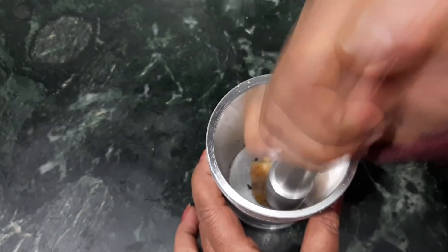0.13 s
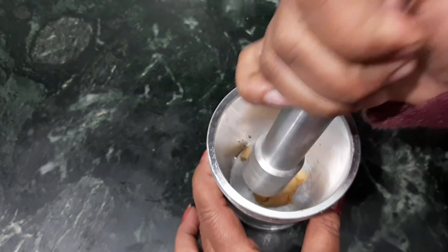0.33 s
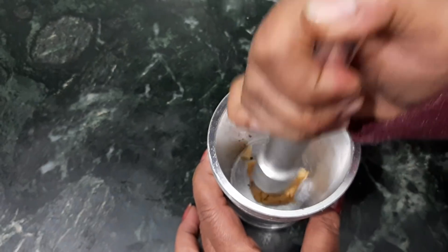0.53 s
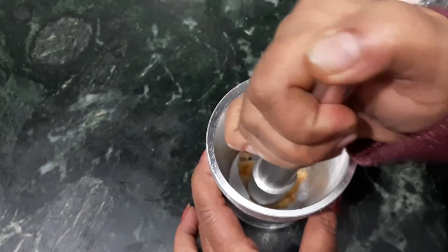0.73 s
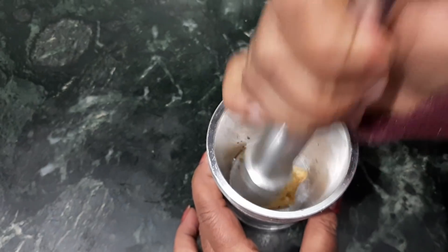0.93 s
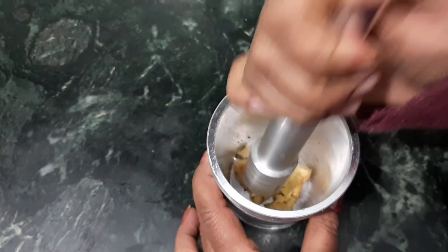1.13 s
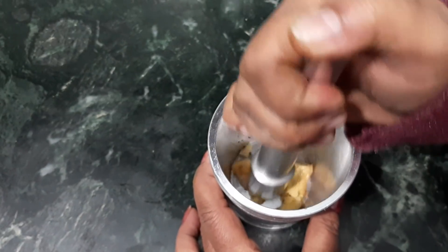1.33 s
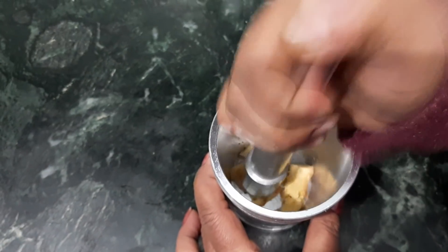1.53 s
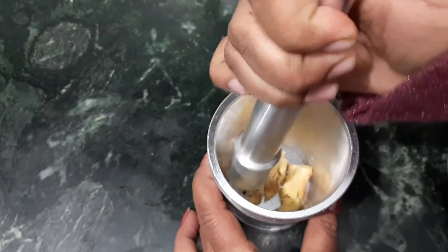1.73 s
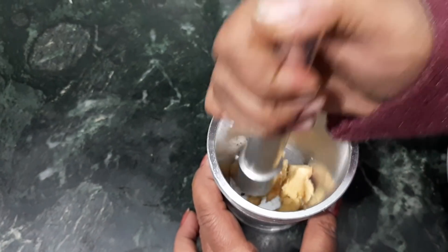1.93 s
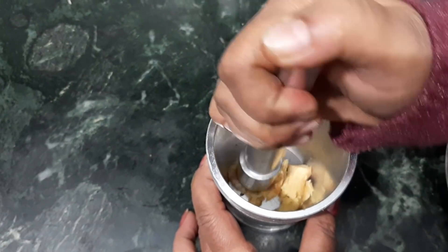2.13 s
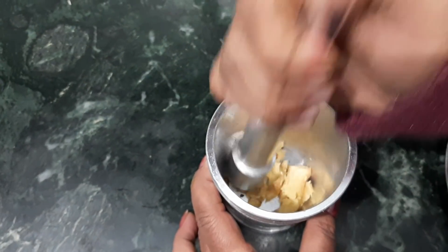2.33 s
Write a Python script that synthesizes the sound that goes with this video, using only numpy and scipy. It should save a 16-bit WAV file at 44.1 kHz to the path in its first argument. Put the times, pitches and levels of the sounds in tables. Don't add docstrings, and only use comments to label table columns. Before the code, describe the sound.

A metal pestle pounds ginger in a gripped metal mortar, heard close in a small kitchen over faint room hush and a low motor drone. Eight blows fall evenly, from 0.2 to 2.1 seconds, about 0.28 apart: crisp wet crunch, brief metallic ring, low boom through the stone counter. The later blows leave more worktop hum. At 2.3 seconds the pestle clinks and chatters on the bare rim, ringing briefly.

```python
import sys
import numpy as np
from scipy import signal
from scipy.fft import rfft, irfft, next_fast_len
from scipy.io import wavfile
from scipy.ndimage import uniform_filter1d, map_coordinates

SR = 44100
rng = np.random.default_rng(int(sys.argv[2]) if len(sys.argv) > 2 else 0)


def wav_out(sig):
    wavfile.write(sys.argv[1], SR, np.round(np.clip(np.atleast_2d(sig).T, -1, 1) * 32767).astype(np.int16))


def natural_amplitude(level_db):
    exponent = np.asarray(level_db, float) / 20
    return 10 ** exponent


N = 104958


def unit(x):
    return x / np.sqrt(np.mean(x ** 2) + 1e-20)


def along(points, hz):
    f, v = np.transpose(points)
    return np.interp(np.log(hz + 1), np.log(f + 1), v)


# frequency in Hz, left-right correlation (0 to 1).
PORT_LIKENESS = [(60, 1), (450, 0.81), (700, 0.031), (1400, 0.012), (2500, 0.21), (4500, 0.018),
                 (15000, 0.019)]


def port_angle(hz):
    return np.arccos(np.clip(along(PORT_LIKENESS, hz), -1, 1)) / 2


def hiss(count, response):
    hz = np.fft.rfftfreq(count, 1 / SR)
    turn = port_angle(hz)
    spectra = rfft(rng.standard_normal((2, count))) * response(hz)
    mid, side = irfft(spectra * [np.cos(turn), np.sin(turn)], count)
    return unit(np.array([mid + side, mid - side]))


def dying(x, t60s):
    hz, t, z = signal.stft(x, SR, nperseg=256)
    fade = natural_amplitude(-60 * t / along(t60s, hz)[:, None])
    return signal.istft(z * fade, SR, nperseg=256)[1][:, :x.shape[1]]


RATTLE_RATE_HZ = 130


def ring(modes, t, scatter_db, detune, rattle_db=0):
    hz, db, t60, rise = np.transpose(modes)[:, :, None]
    level_luck, pitch_luck, phase_luck = rng.standard_normal((3, len(modes), 1))
    knots = rng.standard_normal((len(modes), 200))
    rattle = np.array([np.interp(t * RATTLE_RATE_HZ, np.arange(200), row) for row in knots])
    turn = port_angle(hz) * np.sign(phase_luck + 0.8)
    size = natural_amplitude(db + scatter_db * level_luck + rattle_db * rattle - 60 * t / t60)
    size = size * (1 - np.exp(-t / rise)) ** 3
    phase = 2 * np.pi * hz * (1 + detune * pitch_luck) * t + rattle_db / 6 * rattle[:, ::-1]
    return np.array([(size * np.sin(phase + side * turn)).sum(0) for side in (1, -1)])


def add(out, x, s):
    part = out[:, round((s + 1) * SR):][:, :x.shape[1]]
    part += x[:, :part.shape[1]]


# frequency in Hz, level in dB.
HUSH = [(40, -44), (70, -17), (140, 4), (300, -12), (900, -21), (1250, -37), (2500, -29), (7560, -26),
        (15600, -31.5), (16500, -21)]
HUSH_DB, HUM_DB, HUM_HZ = -50.5, -47, 128


def kitchen():
    drone = hiss(N, lambda f: 1 / (1 + ((f - HUM_HZ) / 6) ** 2))
    hush = hiss(N, lambda f: natural_amplitude(along([(15, -70), *HUSH, (17000, -120)], f)))
    return natural_amplitude(HUSH_DB) * hush + natural_amplitude(HUM_DB) * drone


# frequency in Hz, level in dB.
CRUNCH = [(1200, -23), (1800, -28), (2500, -10.5), (7500, 1.5), (9000, -1.5), (13000, 0.5), (15800, -5),
          (16500, -42)]
# centre in Hz, width in Hz, level in dB.
CAVITY = [(2440, 210, 9), (3520, 980, 5.5), (5030, 440, 2), (5550, 1800, -12), (7360, 470, 1.5),
          (10100, 300, -4), (10800, 1300, -2), (14700, 600, 1)]
# frequency in Hz, t60 in s.
TAIL_T60 = [(1500, 0.98), (3000, 0.56), (7000, 0.34), (10000, 0.28), (15000, 0.31)]
LEAD_S, LEAD_DB, RISE_S, CRUNCH_T60_S = 0.0023, -29, 0.00081, 0.024
SQUELCH_DB, SQUELCH_T60_S, TAIL_DB, GRIT_DB = -2.5, 0.027, -17, 2.5
STREAK_DB, STREAK_HZ = 3.5, 170


def crunch(bands_db):
    t = np.arange(SR // 2) / SR
    luck = rng.standard_normal((len(CAVITY), 2))
    lean = list(zip((3200, 6500, 12500), np.subtract(bands_db, np.mean(bands_db))))
    knots = rng.standard_normal(200)

    def hollow(f):
        total = 0
        for (centre, width, db), (louder, sharper) in zip(CAVITY, luck):
            offset = (f - centre * (1 + 0.038 * sharper)) / width
            total = total + natural_amplitude(db + 2.8 * louder) / (1 + 2j * offset)
        return 0.97 + np.abs(total)

    def colour(f):
        return natural_amplitude(along([(600, -120), *CRUNCH], f) + along(lean, f)) * hollow(f)

    def streaky(f):
        return colour(f) * natural_amplitude(STREAK_DB * np.interp(f / STREAK_HZ, np.arange(200), knots))

    after = np.maximum(t - LEAD_S, 0)
    give = natural_amplitude(LEAD_DB) * np.minimum(t / LEAD_S, 1) * natural_amplitude(-60 * t / CRUNCH_T60_S)
    snap = (1 - np.exp(-after / RISE_S)) * natural_amplitude(-60 * after / CRUNCH_T60_S)
    squelch = natural_amplitude(SQUELCH_DB - 60 * after / SQUELCH_T60_S) * (after > 0)
    grit = natural_amplitude(GRIT_DB * unit(uniform_filter1d(rng.standard_normal(len(t)), size=30)))
    wet = (give + snap + squelch) * grit * hiss(len(t), colour)
    return wet + natural_amplitude(TAIL_DB) * (after > 0) * dying(hiss(len(t), streaky), TAIL_T60)


NOTE_T60_S, MASH_DAMPS_PER_S, PAIR_HZ = 0.28, 1.1, 22


def bowl_note(s, hz):
    t = np.arange(SR // 2) / SR
    t60 = NOTE_T60_S * np.exp(-MASH_DAMPS_PER_S * max(s - 0.5, 0))
    pair = [(hz, -3, t60, 0.001), (hz + PAIR_HZ, -7, t60, 0.001)]
    return ring(pair, t, scatter_db=1.5, detune=0.00038, rattle_db=9.5)


# frequency in Hz, level in dB, t60 in s, build-up in s.
COUNTER = [(78.1, -8, 0.71, 0.0064), (97.97, -2.5, 0.52, 0.0019), (128.84, -11, 0.97, 0.013),
           (299.1, 1.5, 0.12, 0.0084), (315.3, -15, 0.3, 0.0046), (407.5, -10, 0.31, 0.02),
           (445.2, 1, 0.084, 0.014), (866, -22, 0.25, 0.005), (941, -16.5, 0.21, 0.013),
           (1031, -24.5, 0.31, 0.015)]
# frequency in Hz, level in dB, t60 in s, build-up in s.
WORKTOP = [(195, 60, .1, .15), (198, -8, .45, .03), (178, -4, .3, .02), (245, 8, .08, .005),
           (222, -3, .3, .01)]
# frequency in Hz, level in dB, t60 in s, build-up in s.
KNOCK = [(490.5, -27.5, 0.053, 0.00059), (486, -40.5, 0.3, 0.035), (543.6, -46, 0.2, 0.00071),
         (629.5, -43, 0.27, 0.0014), (442, -36.5, 0.16, 0.0041)]
# frequency in Hz, level in dB.
THUD = [(60, 2), (250, 0), (520, -2.5), (900, -8), (1500, -19), (2200, -24)]
# frequency in Hz, t60 in s.
RUMBLE_T60 = [(60, 0.35), (200, 0.97), (500, 0.55), (1200, 0.45), (2000, 0.85)]
BOOM_DB, THUD_DB, RUMBLE_DB = 6.5, -28, -13


def counter(knock_db, boom_db, note_db, landing_db):
    t = np.arange(SR // 2) / SR
    hum, chest, box, cup = landing_db
    place = [(105, 0), (129, hum), (180, 0), (300, chest), (400, 0), (520, 0), (633, box), (930, cup), (1300, 0)]

    def favoured(modes):
        return [(hz, db + along(place, hz), *times) for hz, db, *times in modes]

    low = hiss(len(t), lambda f: natural_amplitude(along([(40, -60), *THUD, (3000, -120)], f) + along(place, f)))
    thud = natural_amplitude(THUD_DB - 60 * t / 0.036) * low * (1 - np.exp(-t / 0.0037))
    knock = thud + ring(favoured(KNOCK), t, scatter_db=0.7, detune=0.011, rattle_db=2.0)
    rumble = natural_amplitude(RUMBLE_DB) * dying(low, RUMBLE_T60) * (1 - np.exp(-t / 0.00055))
    boom = rumble + ring(favoured(COUNTER), t, scatter_db=0.73, detune=0.0048, rattle_db=1.72)
    note = ring(WORKTOP, t, scatter_db=1.4, detune=0.0022, rattle_db=4.5)
    return natural_amplitude(knock_db) * knock + natural_amplitude(boom_db + BOOM_DB) * boom + natural_amplitude(note_db) * note


# start in seconds, crunch peak in dB, boom in dB, worktop note in dB, bowl ring in dB.
BLOWS = [
    (0.1928, -12.5, -31.5, -43.5, -34),
    (0.4735, -10, -31, -40, -31),
    (0.754, -11.5, -32.5, -42.5, -55),
    (1.0315, -11.5, -33, -48, -28),
    (1.3097, -10, -32, -36, -28),
    (1.5889, -12.5, -32, -27.5, -24),
    (1.8593, -14, -33, -28.5, -25.5),
    (2.138, -9, -31, -26.5, -24),
]
# bowl note in Hz, crunch low, middle and top in dB, knock in dB.
COLOURS = [(2690, -22, -24, -27.5, 1), (2490, -18, -20.5, -23, -1), (2440, -8.5, -9, -12.5, 0),
           (2540, -34.5, -31, -33.5, 1), (2500, -30.5, -33, -29, 1), (2565, -29, -31.5, -29.5, 2),
           (2775, -29, -27.5, -33, -0.5), (2620, -17, -16, -21.5, 7)]
EARLIER = (-9, -31, -57, -39, 2501, 1.5, -2, 0.5, 6)
# mode gains in dB near 130, 300, 630 and 930 Hz.
LANDINGS = [(-7, -10.5, -5, 2), (-2, 0, 3, 5), (1.5, -1.5, 1, 5.5), (1.5, 3, -5.5, 4.5),
            (-1, 3.5, 4.5, -2.5), (-5.5, 2.5, 2, 0.5), (-1.5, 3.5, 2.5, 1.5), (2, -7, -6, -2.5),
            (-5.5, 0, 4.5, -3.5)]
EARLIER_S, BOOM_LAG_S = 0.086, 0.00139
CRUNCH_DB, BOWL_DB = -11.5, -9


def pounding():
    out = np.zeros((2, N + SR))
    rows = [(-EARLIER_S, *EARLIER)] + [(*blow, *colour) for blow, colour in zip(BLOWS, COLOURS)]
    for row, landing_db in zip(rows, LANDINGS):
        s, crunch_db, boom_db, note_db, bowl_db, bowl_hz, *bands_db, knock_db = row
        add(out, natural_amplitude(crunch_db + CRUNCH_DB) * crunch(bands_db), s - LEAD_S)
        add(out, natural_amplitude(bowl_db + BOWL_DB) * bowl_note(s, bowl_hz), s)
        add(out, counter(knock_db, boom_db, note_db, landing_db), s + BOOM_LAG_S)
    return out[:, SR:]


# start in seconds, frequency in Hz, level in dB.
SPOTS = [(0.1927, 2780, -38), (0.1924, 4540, -30.5), (0.1913, 7780, -28), (0.1928, 8400, -40),
         (0.1928, 12390, -36), (0.4735, 3424, -32.5), (0.472, 4040, -36), (0.4724, 5200, -26.5),
         (0.4723, 7900, -52), (0.474, 12700, -37), (0.754, 3380, -37), (0.754, 5080, -38),
         (0.754, 6420, -39), (0.755, 7400, -29), (0.753, 9940, -37), (1.0312, 5060, -42),
         (1.0313, 5920, -28.5), (1.0294, 7500, -29), (1.0311, 11400, -34), (1.0311, 12430, -36),
         (1.3096, 5200, -29), (1.3096, 7330, -43), (1.309, 9760, -28.5), (1.309, 13400, -45),
         (1.3096, 14490, -40), (1.5912, 2810, -33.5), (1.5902, 4420, -32.5), (1.588, 6460, -36.5),
         (1.5892, 7600, -36), (1.589, 10600, -33), (1.8587, 5250, -38), (1.8594, 6350, -39),
         (1.8594, 7270, -35.5), (1.86, 8540, -36), (1.859, 11900, -39), (2.137, 2714, -31.5),
         (2.137, 3530, -35), (2.137, 4730, -42), (2.14, 7360, -28.5), (2.138, 12840, -30),
         (0.4755, 3750, -34),
    (0.4755, 3820, -36),
    (1.3096, 3390, -35),
    (2.1383, 3120, -33),
    (2.139, 3390, -31.5),
    (0.194, 3270, -35),
]
SPOT_DB, SPOT_T60_S, SPOT_RISE_S, SPLIT = 6, 0.037, 0.0005, 0.023
AFTER_DB, AFTER_T60_S, AFTER_HZ = -22, 0.21, 250


def wall():
    out, t = np.zeros((2, N + SR)), np.arange(SR // 4) / SR
    for s, hz, db in SPOTS:
        split = [(hz * (1 + side * SPLIT), db - 5 * abs(side), SPOT_T60_S, SPOT_RISE_S) for side in (-1, 0, 1)]
        modes = ring(split, t, scatter_db=1.5, detune=0.0042, rattle_db=3.0)
        grain = hiss(len(t), lambda f: 1 / (1 + ((f - hz) / AFTER_HZ) ** 2))
        after = natural_amplitude(db + AFTER_DB - 60 * t / AFTER_T60_S) * (1 - np.exp(-t / 0.002)) * grain
        add(out, natural_amplitude(SPOT_DB) * (modes + after), s)
    return out[:, SR:]


# start in seconds, level in dB, upper modes in dB.
CLINKS = [(2.297, -11.5, 0.5), (2.304, -29, 2), (2.3095, -29, -6), (2.3215, -17.5, -3.5), (2.329, -22, -12),
          (2.333, -27.5, -6), (2.337, -28, -13), (2.347, -28, -6), (2.361, -34, -12), (2.369, -34, -1),
          (2.376, -40, -12)]
# frequency in Hz, level in dB, t60 in s.
RIM = [(1736, -29.5, .07), (2305, -13.5, 0.083), (2887, -2, 0.031), (2950, -13, .025), (3160, -11, .04),
       (3330, -11, 0.031), (3700, -9, 0.022), (3790, -22, 0.04), (4820, -23, 0.063), (6490, -8.5, 0.034),
       (7560, -14.5, 0.028), (9440, -18.5, .05), (10900, -23.5, 0.12), (11860, -37, .12)]
# frequency in Hz, level in dB.
TICK = [(300, -60), (1900, -26), (2600, -4), (3600, 0), (5500, -14), (8000, -30), (16000, -60)]
# frequency in Hz, level in dB.
SHUFFLE = [(100, -7), (400, -6), (900, -5.5), (1600, -9), (2400, -3)]
# time in seconds, level in dB.
SING = [
    (2.297, -34),
    (2.303, -32),
    (2.305, -21),
    (2.319, -25),
    (2.324, -22),
    (2.336, -17.5),
    (2.347, -32),
    (2.364, -40),
    (2.379, -32),
]
TICK_DB, SHUFFLE_DB, SHUFFLE_T60_S, UPPER_HZ = -6, -29.5, 0.41, 5500
SING_HZ, SING_TURN_RAD, RIM_ROOM_DB = 2527, 0.3, -16


def singing():
    time = np.arange(N) / SR
    s, db = np.transpose(SING)
    where = [np.repeat([[0], [1]], N, 1), np.tile(time * 90, (2, 1))]
    waver = 0.49 * map_coordinates(rng.standard_normal((2, 400)), where, order=3)
    phase = 2 * np.pi * SING_HZ * time + waver + [[SING_TURN_RAD], [-SING_TURN_RAD]]
    return np.sqrt(2) * natural_amplitude(np.interp(time, s, db, left=-120)) * np.sin(phase)


def clink():
    out, t = np.zeros((2, N + SR)), np.arange(SR // 8) / SR
    for s, db, upper_db in CLINKS:
        tick = natural_amplitude(TICK_DB - 60 * t / 0.0047) * hiss(len(t), lambda f: natural_amplitude(along(TICK, f)))
        scrape = hiss(len(t), lambda f: natural_amplitude(along([(40, -60), *SHUFFLE, (4000, -120)], f)))
        shuffle = natural_amplitude(SHUFFLE_DB - 60 * t / SHUFFLE_T60_S) * (1 - np.exp(-t / 0.00084)) * scrape
        modes = [(hz, level + upper_db * (hz > UPPER_HZ), t60, 0.0003) for hz, level, t60 in RIM]
        rim = ring(modes, t, scatter_db=1.2, detune=0.0015, rattle_db=1.6)
        add(out, natural_amplitude(db) * (rim + tick + shuffle), s)
    direct = out[:, SR:] + singing()
    walls = hiss(SR // 6, lambda f: f > 2000) * natural_amplitude(-60 * np.arange(SR // 6) / SR / 0.38)
    echo = signal.fftconvolve(direct, walls / np.linalg.norm(walls[0]), axes=1)[:, :N]
    return direct + natural_amplitude(RIM_ROOM_DB) * echo


def scene():
    return kitchen() + pounding() + wall() + clink()


def band_limit(x):
    return signal.sosfilt(signal.butter(12, 16820, fs=SR, output="sos"), x)


LOW_CUT_HZ, TOP_HZ, LEFT_DB = 50, 15900, -0.32


def record(dry):
    size = next_fast_len(N + SR // 4)
    hz = np.fft.rfftfreq(size, 1 / SR)
    low_cut = (hz ** 2 / (hz ** 2 - 1.4j * hz * LOW_CUT_HZ - LOW_CUT_HZ ** 2)) ** 2
    top_cut = 1 / (1 + (hz / TOP_HZ) ** 60)
    ports = low_cut * top_cut * natural_amplitude(np.array([[LEFT_DB], [0]]))
    mix = irfft(rfft(dry, size) * ports, size)[:, :N]
    return band_limit(mix)


dry = scene()
out = record(dry)
wav_out(out)
```